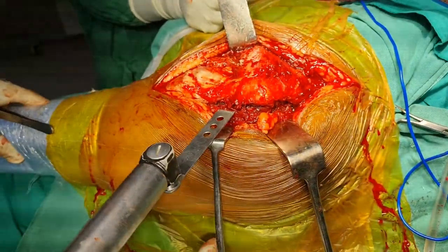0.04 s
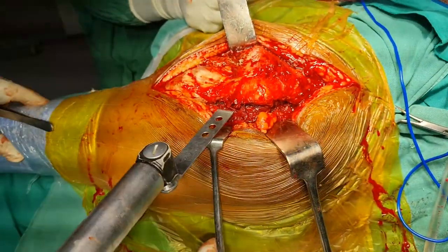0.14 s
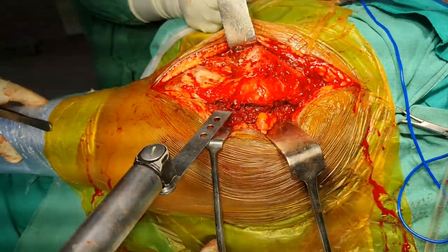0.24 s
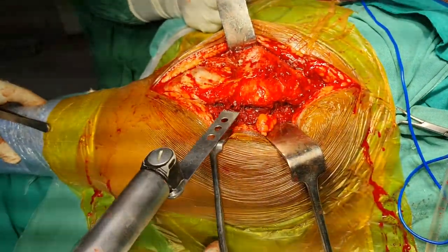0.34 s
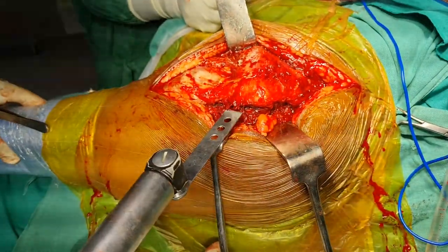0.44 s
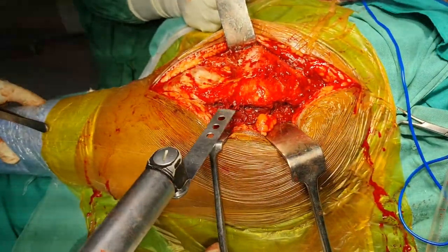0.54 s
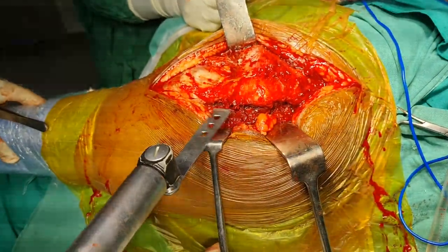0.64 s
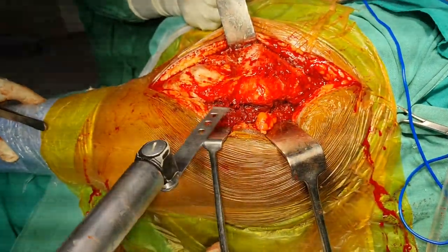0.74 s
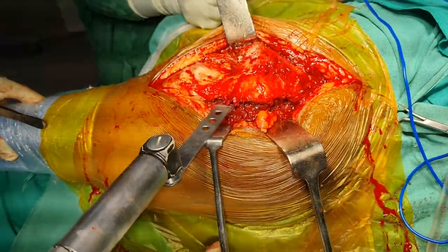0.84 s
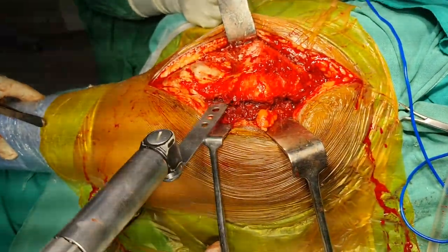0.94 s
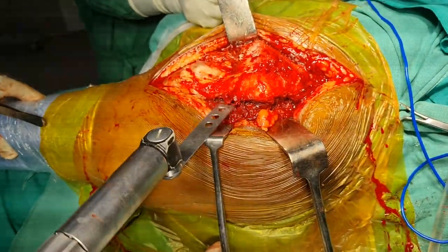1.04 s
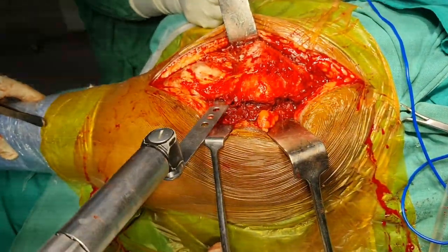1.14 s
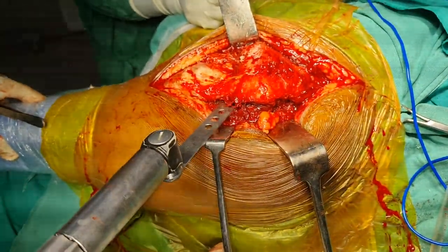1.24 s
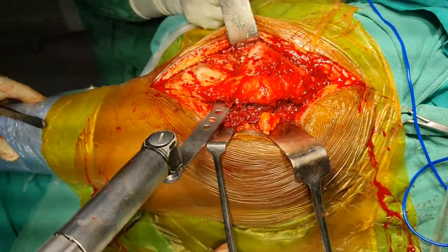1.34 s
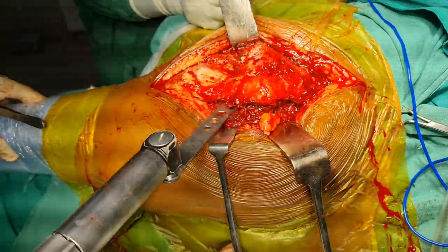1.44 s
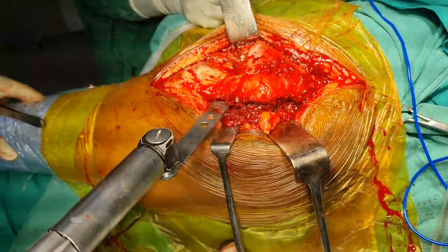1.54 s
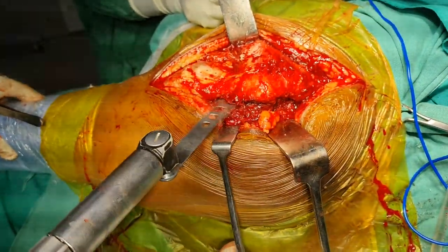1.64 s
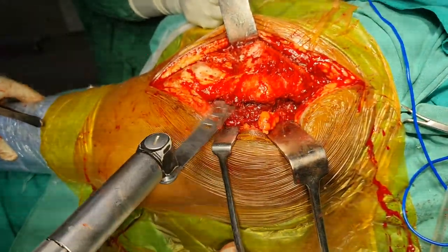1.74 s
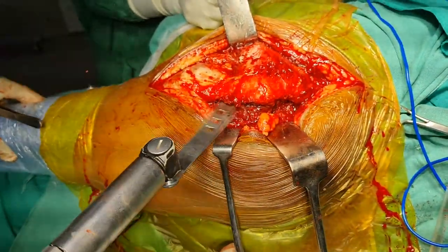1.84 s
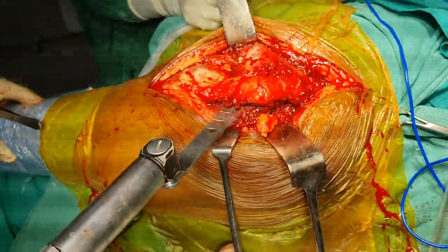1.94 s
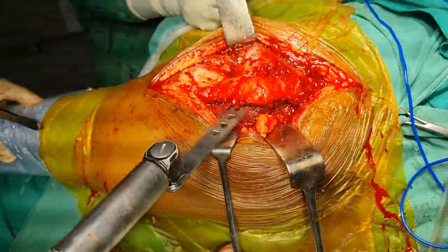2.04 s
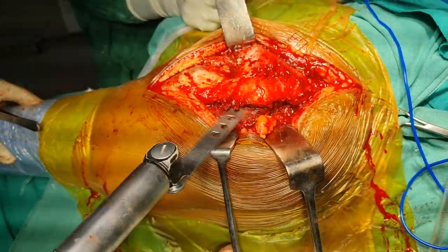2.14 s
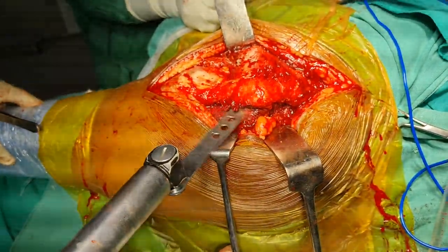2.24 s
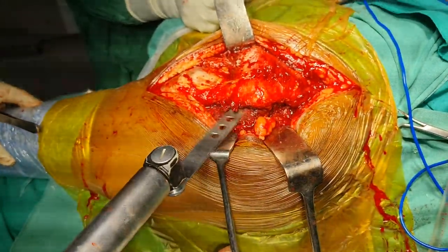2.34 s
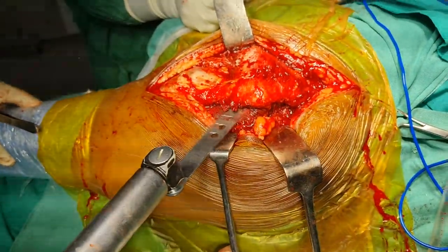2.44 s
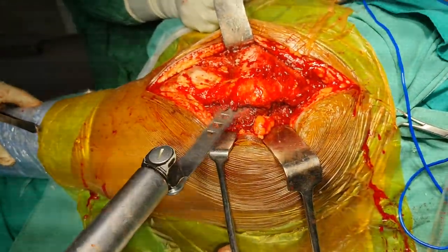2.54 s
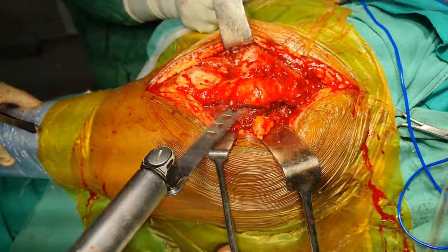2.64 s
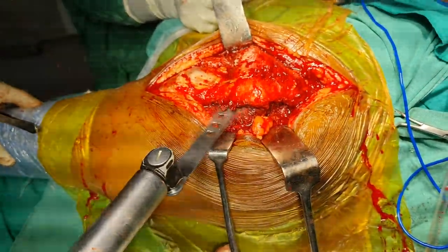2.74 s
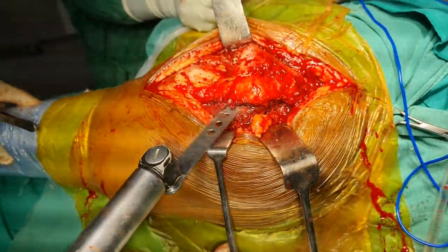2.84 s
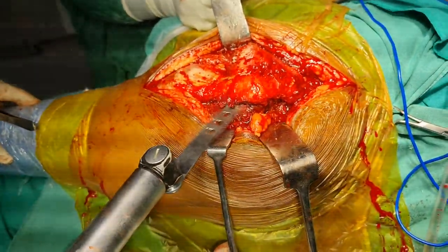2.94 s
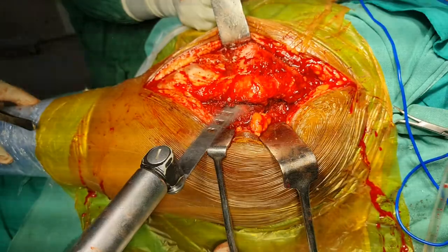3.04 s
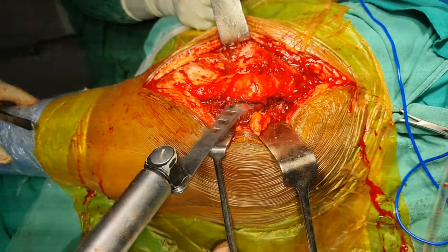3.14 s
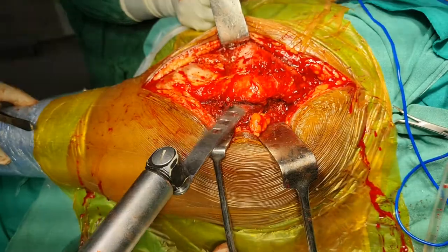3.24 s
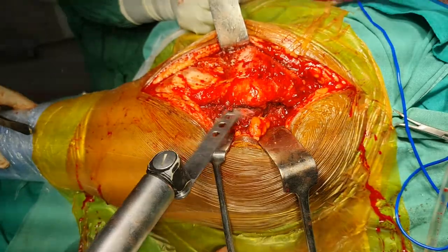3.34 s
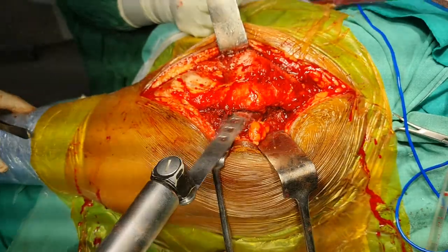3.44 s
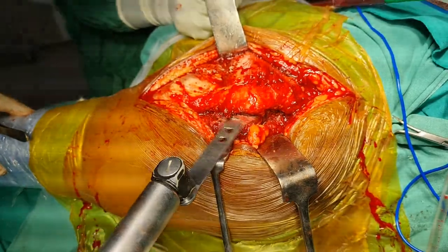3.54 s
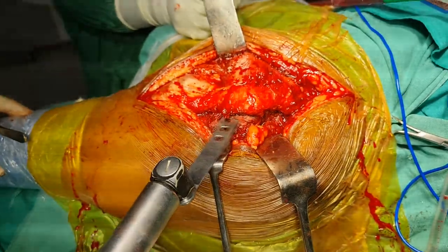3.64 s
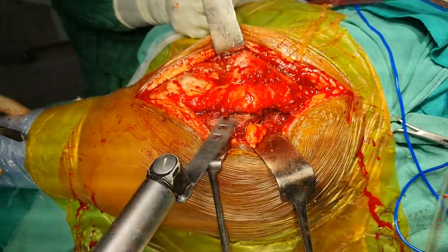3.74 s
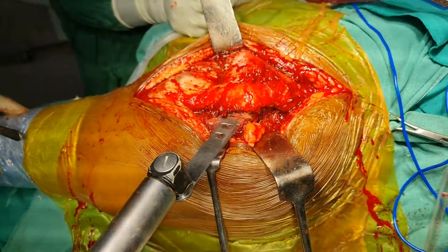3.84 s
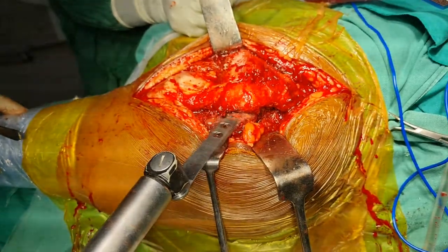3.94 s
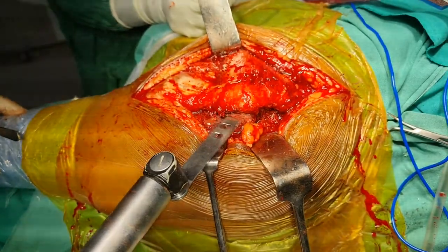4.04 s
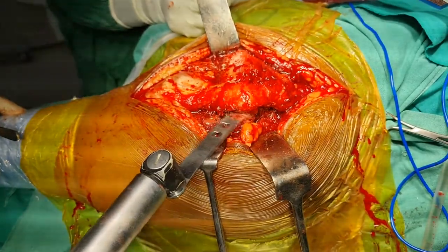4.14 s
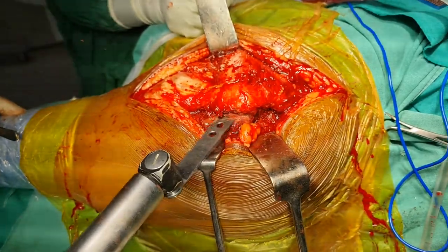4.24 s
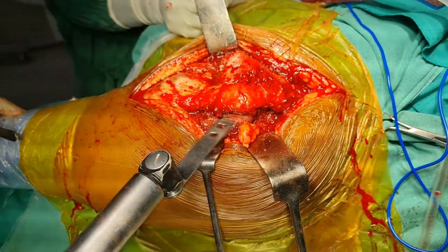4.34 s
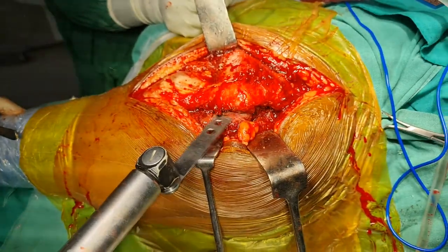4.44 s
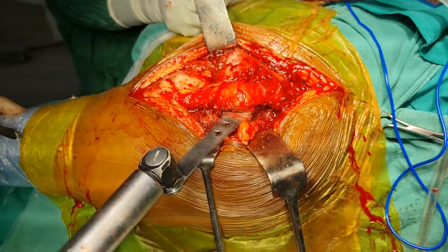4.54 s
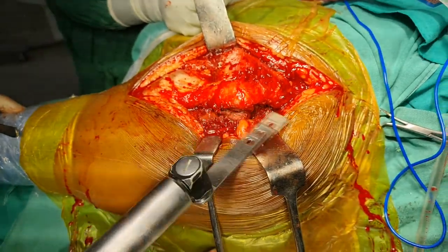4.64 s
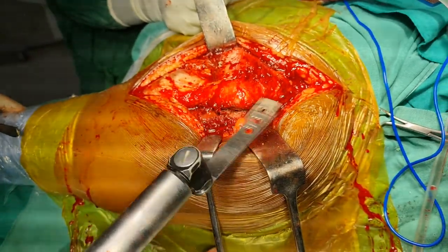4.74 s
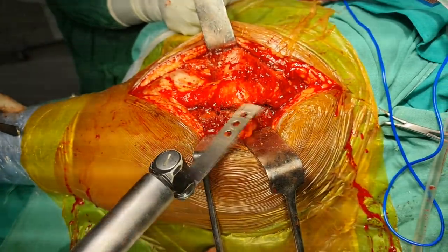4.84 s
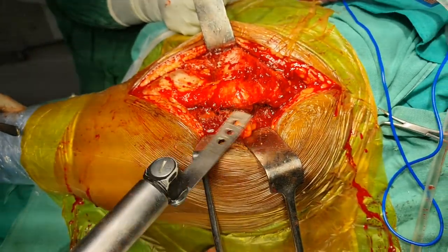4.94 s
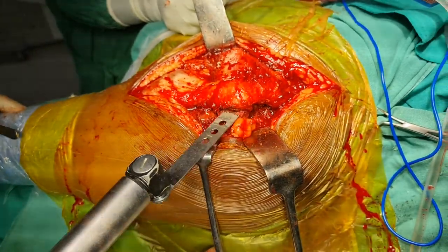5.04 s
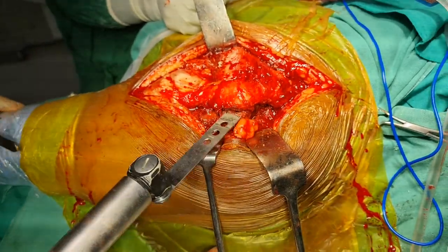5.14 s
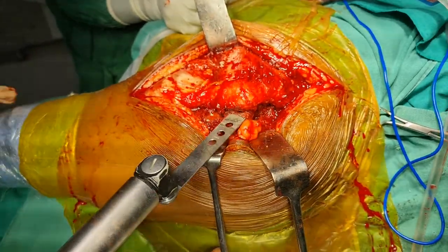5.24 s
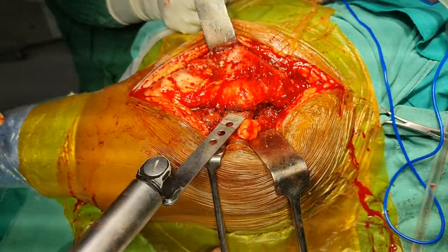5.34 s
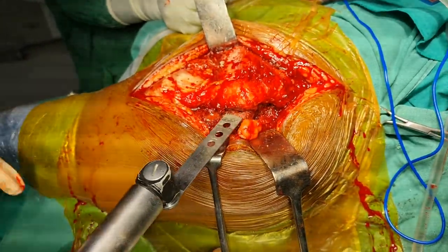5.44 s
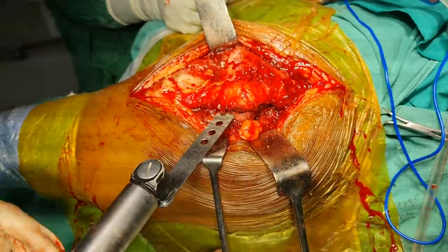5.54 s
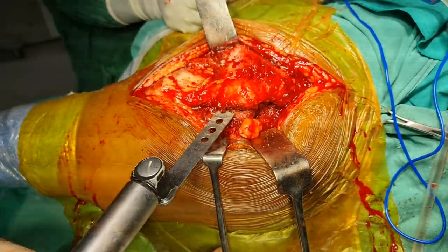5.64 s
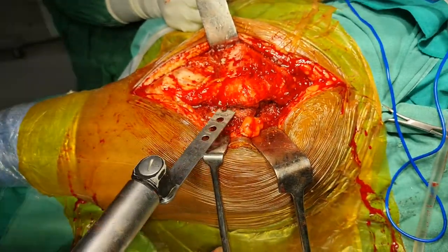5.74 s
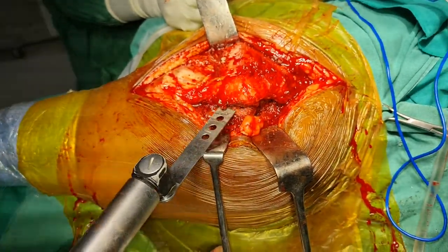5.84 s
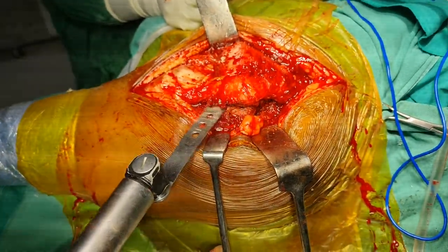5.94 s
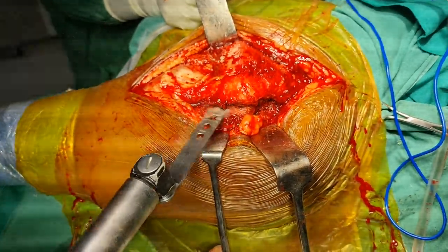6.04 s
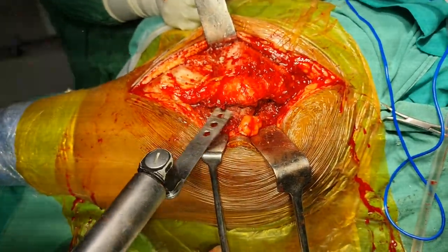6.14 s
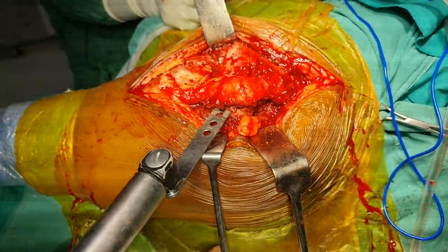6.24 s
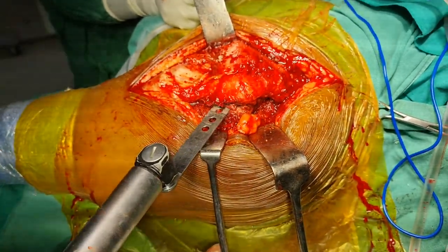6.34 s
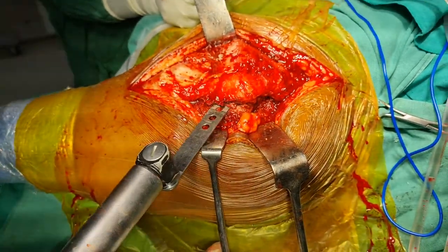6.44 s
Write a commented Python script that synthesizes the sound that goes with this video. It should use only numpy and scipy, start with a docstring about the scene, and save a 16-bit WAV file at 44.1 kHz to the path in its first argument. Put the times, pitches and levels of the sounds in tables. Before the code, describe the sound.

An oscillating bone saw rattles at low speed, races into a hard buzzing whine as it cuts, stops, then blips once and taps bone.

```python
"""An oscillating bone saw close to two microphone ports in a hard-walled theatre. Ventilation murmurs
throughout (shaped noise); suction spits and hisses away at once (decaying noise), and small ticks fall.
The saw idles, runs up, cuts and stops: its blade sings in multiples of the stroke rate and hisses, its
gears rasp, its teeth grind, and it slaps the bone (struck resonances); low thumps fall meanwhile (decaying
sines). The saw is blipped once more, and the blade tip taps the bone (noise bursts through resonances)."""
import sys
import numpy as np
from scipy import signal
from scipy.fft import rfft, irfft, next_fast_len
from scipy.io import wavfile
from scipy.ndimage import uniform_filter1d

SR = 44100
rng = np.random.default_rng(int(sys.argv[2]) if len(sys.argv) > 2 else 0)


def master_out(mix):
    """Clip the mix to full scale and print it as 16-bit PCM to the path in sys.argv[1]."""
    frames = np.transpose(np.atleast_2d(mix))
    ceiling = np.clip(frames, -1, 1)
    pcm = np.round(ceiling * 32767).astype(np.int16)
    wavfile.write(sys.argv[1], SR, pcm)


N = 286209
T = np.arange(N) / SR  # s


def amp(db):
    """Level to amplitude: 20 dB per factor of ten."""
    return 10 ** (np.asarray(db) / 20)


def unit(x):
    """Normalisation to an rms of 1."""
    return x / np.sqrt(np.mean(x ** 2) + 1e-20)


def along(points, hz):
    """Interpolation of (f/Hz, value) points on a logarithmic frequency axis."""
    f, v = np.transpose(points)
    return np.interp(np.log(hz + 1), np.log(f + 1), v)


def gain(table):
    """Spectral envelope: the gain at each frequency from (f/Hz, level/dB) points."""
    return lambda hz: amp(along(table, hz))


def curves(rows):
    """Linear interpolation in time: one value per sample for each column after t/s."""
    s, *columns = np.transpose(rows)
    return [np.interp(T, s, column) for column in columns]


def wobble(rate):
    """Slow random modulation: Gaussian knots, rate of them a second, joined by lines."""
    knots = rng.standard_normal(int(N * rate / SR) + 2)
    return np.interp(np.arange(N) * rate / SR, np.arange(len(knots)), knots)


def filtered(x, response):
    """Linear filtering: the spectrum times a complex response of frequency."""
    m = next_fast_len(N + SR // 2)
    return irfft(rfft(x, m) * response(np.fft.rfftfreq(m, 1 / SR)), m)[..., :N]


def modes(table):
    """Modal superposition: causal response of resonances (f/Hz, width/Hz, level/dB)."""
    def response(f):
        return sum(amp(db) * 1j * f * w / (c * c - f * f + 1j * f * w) for c, w, db in table)
    return response


def patchy(x, patchy_db):
    """Random modulation in patches of time and frequency."""
    z = signal.stft(x, nperseg=512)[2]
    field = rng.standard_normal(z.shape[-2:])
    field = uniform_filter1d(uniform_filter1d(field, 7, 0), 12, 1)
    return unit(signal.istft(z * amp(patchy_db * unit(field)), nperseg=512)[1][..., :N])


def gated(turns, depth, scatter_db):
    """Cyclic modulation: two noises swell once a turn, each turn at a new strength."""
    strengths = amp(scatter_db * rng.standard_normal(int(turns[-1]) + 1))
    swell = np.exp(-depth * np.cos(2 * np.pi * turns))
    return rng.standard_normal((2, N)) * strengths[turns.astype(int)] * swell


def pair(x, spectrum, alike, patchy_db):
    """Partial coherence: two coloured noises mixed to a given left-right likeness, rms 1."""
    def response(hz):
        angle = np.arccos(np.clip(along(alike, hz), -1, 1)) / 2
        return spectrum(hz) * [np.cos(angle), np.sin(angle)]
    mid, side = filtered(patchy(x, patchy_db), response)
    return unit(np.array([mid + side, mid - side]))


def stack(turns, stroke_hz, order, level, swell_db, blur):
    """Harmonic synthesis: multiples swell and waver one by one, a little apart at the ports, rms 1."""
    x, coarse = np.zeros((2, N)), np.arange(0, N, 256)
    for k in order:
        level_db = np.interp(np.arange(N), coarse, level(k * stroke_hz[coarse], coarse / SR))
        level_db = level_db + swell_db * (wobble(9) + 1.57 * wobble(35))
        # higher multiples waver more
        phase = 2 * np.pi * (k * turns + rng.random()) + k * blur * wobble(40)
        apart = 0.97 * wobble(5)  # rad
        x += amp(level_db) * np.sin([phase + apart, phase - apart])
    return unit(x)


# left-right coherence of the background: f/Hz, likeness (1 = identical)
BACKGROUND_LIKENESS = [(60, 0.97), (240, 0.93), (950, 0), (3770, 0.061), (15000, 0.2)]
# ventilation spectrum: f/Hz, relative level/dB
AIR_SPECTRUM = [(15, -39.5), (25, -22.5), (44, -6.5), (217, -4.5), (255, -4), (343, -7.5), (438, -8.5),
                (731, -15.5), (1440, -16.5), (9780, -40.5), (12100, -43.5), (15900, -70)]
# ventilation, lower while the saw is loud: t/s, level/dB
AIR_LEVEL = [(0, -47), (0.5, -48), (1, -50), (2, -59), (4.9, -60.5), (5.4, -55), (5.9, -52), (6.1, -57),
             (6.49, -53.5)]


def ventilation():
    """Broadband flow noise, coherent at the two ports in the bass and hardly above."""
    air = pair(rng.standard_normal((2, N)), gain(AIR_SPECTRUM), BACKGROUND_LIKENESS, patchy_db=0.5)
    return amp(curves(AIR_LEVEL)[0]) * air


# suction spectrum: f/Hz, relative level/dB
JET_SPECTRUM = [(710, -44), (1200, -30), (1400, -9), (1460, -35), (2530, -11), (2940, -16.5), (5630, -17.5),
                (6270, -3), (7790, -18.5), (15900, -18)]
# spits of the suction: t/s, level/dB
SUCTION_SPITS = [(0.0, -31), (0.136, -58.5), (0.238, -57.5), (0.315, -47.5)]
SPIT_T60_S, JET_DB, JET_FADE_DB_PER_S = 0.051, -56, 41.5


def suction():
    """Jet noise under exponential decay: a dying hiss and short spits."""
    flow = amp(JET_DB - JET_FADE_DB_PER_S * T)
    for s, db in SUCTION_SPITS:
        flow = flow + (T >= s) * amp(db - 60 * np.abs(T - s) / SPIT_T60_S)
    jet = pair(rng.standard_normal((2, N)), gain(JET_SPECTRUM), BACKGROUND_LIKENESS, patchy_db=7.5)
    return flow * jet


# clicks of metal and wet tissue: t/s, relative level/dB, f/Hz
SMALL_TICKS = [(0.074, -34.5, 5940), (0.139, -45.5, 3040), (0.314, -45.5, 6050), (5.539, -39.5, 6700),
               (5.6331, -38, 2939), (5.89, -31, 3757), (5.913, -34.5, 3560), (5.933, -23, 3157),
               (6.333, -30.5, 3060), (6.3677, -27, 5690), (6.4333, -36.5, 3084), (6.4718, -23.5, 3530)]


def ticks():
    """Damped oscillation plus a differentiated noise burst: small bright clicks."""
    x, t = np.zeros(N + 600), np.arange(600) / SR
    for s, db, hz in SMALL_TICKS:
        envelope = amp(db - 60 * t / .015) * (1 - np.exp(-t / .001))
        tone = 0.39 * np.sin(2 * np.pi * hz * t)
        burst = 0.46 * np.diff(rng.standard_normal(601))
        x[round(s * SR):][:600] += envelope * (tone + burst)
    return x[:N]


# motor speed, sagging as the blade bites: t/s, stroke rate f/Hz
STROKE_RATE = [(0.5, 56.8), (0.72, 90.95), (0.86, 102.5), (0.98, 101.9), (1.1, 106.9), (1.15, 105.8),
               (1.23, 95.4), (1.41, 92.47), (1.48, 100.9), (1.58, 105.8), (1.66, 141.4), (1.79, 252.3),
               (1.88, 249.1), (2.13, 253.8), (2.2, 250.4), (2.57, 246.5), (2.74, 243.5), (2.98, 244.7),
               (3.1, 238.8), (3.23, 238.2), (3.3, 243.6), (3.38, 245.2), (3.52, 241.8), (3.6, 237.1),
               (3.69, 240.9), (3.81, 240.2), (4.01, 248.2), (4.08, 245.3), (4.18, 240.5), (4.33, 251.1),
               (4.43, 240.3), (4.53, 246.4), (4.62, 248.3), (4.71, 257.9), (4.87, 257), (4.92, 255.9),
               (5.0, 170.9), (5.9, 60.8), (6.01, 163), (6.052, 236.6), (6.074, 247.4), (6.14, 116.9)]
IDLE_HZ, FULL_HZ = 117, 248  # top of idling, full speed


def stroke():
    """Phase is the integral of frequency: stroke rate, share of full speed, jittered stroke count."""
    (stroke_hz,) = curves(STROKE_RATE)
    fast = np.clip((stroke_hz - IDLE_HZ) / (FULL_HZ - IDLE_HZ), 0, 1)
    turns = np.cumsum(stroke_hz * (1 + 0.00214 * wobble(60))) / SR
    return stroke_hz, fast, turns


# trigger pressed: start t/s, end t/s
TRIGGER = [(0.524, 5.0), (5.9, 6.14)]
# t/s, then level/dB of the gear rasp, the treble hiss, the blade's overtones and its whine
LAYER_LEVELS = [(0.5, -81, -90, -63, -62), (0.55, -44.5, -60, -58, -50), (0.62, -30.5, -43.5, -55, -44),
                (0.73, -25, -31, -38, -40), (0.86, -24, -32, -33, -32.5), (0.95, -24.5, -31, -38, -30.5),
                (0.98, -25.5, -26.5, -33, -34), (1.02, -29, -33, -33, -44), (1.06, -25.5, -24.5, -28, -29),
                (1.1, -27.5, -27, -35, -33), (1.15, -25, -24.5, -32, -30), (1.23, -23.5, -30, -46, -34),
                (1.3, -23, -28, -36, -32.5), (1.37, -24, -37, -31, -34), (1.54, -24.5, -34, -29, -31.5),
                (1.6, -21, -31, -28.5, -25), (1.7, -18, -26, -21.5, -24), (1.77, -17.5, -28.5, -17.5, -24),
                (1.82, -23, -24.5, -19.5, -18.5), (1.9, -21.5, -28.5, -20.5, -20.5),
                (2.2, -27, -26.5, -18.5, -21), (2.57, -26.5, -25, -25, -21.5), (2.7, -30, -23, -23.5, -26),
                (2.8, -37, -26.5, -27, -27.5), (2.98, -27.5, -28, -25.5, -23.5),
                (3.1, -27.5, -32.5, -25, -23), (3.23, -27.5, -29.5, -26.5, -23),
                (3.3, -35, -28.5, -22, -18), (3.6, -26.5, -29, -24, -21), (3.81, -26.5, -27, -20.5, -20.5),
                (4.01, -26.5, -28, -22, -19), (4.33, -26.5, -26.5, -21, -22),
                (4.53, -23.5, -29, -23.5, -19.5), (4.62, -21.5, -24, -23, -23),
                (4.66, -25.5, -30, -24, -28), (4.71, -21.5, -21.5, -24.5, -22),
                (4.75, -28.5, -32, -18.5, -23.5), (4.87, -21, -30.5, -24, -23.5),
                (4.92, -22, -32, -19.5, -28), (4.94, -25.5, -32.5, -48.5, -30), (4.97, -34, -35, -46, -39),
                (5.0, -45, -46.5, -55, -58.5), (5.9, -55, -80.5, -60.5, -58), (5.944, -42, -56, -61, -48),
                (5.99, -31, -39, -45, -37), (6.02, -19.5, -33.5, -22.5, -37),
                (6.052, -20.5, -29, -15.5, -25), (6.074, -30, -26, -15.5, -15), (6.1, -22, -32, -25, -34),
                (6.14, -38, -36, -64, -54)]
# teeth grinding on bone: t/s, level/dB
GRIND_LEVEL = [(0.5, -60), (0.62, -39.5), (0.7, -40), (0.97, -40), (1.03, -31), (1.1, -33), (1.3, -29.5),
               (1.5, -46), (1.7, -14.5), (1.8, -40), (2.5, -39.5), (3, -46.5), (3.7, -39.5), (4.5, -36.5),
               (4.64, -30), (4.8, -38), (4.95, -33.5), (5.0, -56), (5.9, -57.5), (5.99, -31), (6.02, -13),
               (6.05, -21), (6.14, -52)]
FLICKER_DB, FLICKER_PER_S = 1, 14  # each of the four layers flickers by itself
# the squeal follows the treble's departure from a reference, by so many dB per dB
SQUEAL_DB, SQUEAL_PER_TREBLE_DB, TREBLE_REFERENCE_DB = -31.5, 0.87, -28


def saw():
    """Superposition of sources phase-locked to one stroke counter."""
    pressed = sum((T > a) & (T < b) for a, b in TRIGGER) * 1.
    on = uniform_filter1d(pressed, size=400)
    stroke_hz, fast, turns = stroke()
    layers_db = [db + FLICKER_DB * wobble(FLICKER_PER_S) for db in curves(LAYER_LEVELS)]
    rasp_db, hiss_db, over_db, whine_db = layers_db
    squeal_db = SQUEAL_DB + SQUEAL_PER_TREBLE_DB * (hiss_db - TREBLE_REFERENCE_DB)
    mix = starting(turns) + amp(whine_db) * whine(turns, stroke_hz, fast)
    mix = mix + amp(rasp_db) * rasp(turns, fast) + amp(hiss_db) * hiss(turns)
    mix = mix + amp(over_db) * overtones(turns, stroke_hz, fast)
    mix = mix + amp(squeal_db) * squeal(turns, stroke_hz)
    mix = mix + amp(curves(GRIND_LEVEL)[0]) * grind(turns)
    return on * mix + slaps(turns)


# left-right coherence of the saw's noise: f/Hz, likeness (1 = identical)
SAW_LIKENESS = [(500, 0.13), (1400, 0.27), (3000, 0.18), (5000, 0.13), (9000, 0.16), (15000, 0.38)]


def saw_noise(noises, spectrum, patchy_db):
    """Partial coherence of an extended source near two ports."""
    return pair(noises, spectrum, SAW_LIKENESS, patchy_db)


# two resonances of the housing: f/Hz, width/Hz, relative level/dB
HOUSING_MODES = [(1210, 170, -3), (3330, 420, 0)]
# the housing sings as the motor starts: peak t/s, level/dB
MOTOR_STARTS = [(0.62, -28.5), (5.96, -43)]
START_RISE_DB_PER_S, START_FALL_DB_PER_S = 186, 150.5


def starting(turns):
    """Transient resonance: the housing's two modes swell and decay exponentially."""
    envelope = 0
    for s, db in MOTOR_STARTS:
        slope = np.where(T < s, START_RISE_DB_PER_S, START_FALL_DB_PER_S)
        envelope = envelope + amp(db - slope * np.abs(T - s))
    housing = modes(HOUSING_MODES)
    return envelope * saw_noise(gated(turns, .4, 1.5), lambda f: np.abs(housing(f)) ** 2, patchy_db=-1.0)


# immersion of the blade: t/s, share of the blade in the cut
CUT_DEPTH = [(0, 0.051), (2.8, 0.065), (3.3, 0.87), (4.6, 0.77), (4.7, 0.07), (6.49, 0.21)]


def sunk(s):
    """Boundary condition: the share of the blade held by bone at time s."""
    return np.clip(np.interp(s, *np.transpose(CUT_DEPTH)), 0, 1)


LIFT_S, LIFT_LENGTH_S, RETURN_S = 4.64, .03, 5.5  # leaves the cut; back on the bone after the pause


def lifted(s):
    """Boundary condition: 1 once the blade is free of the bone, 0 on it."""
    return np.clip((s - LIFT_S) / LIFT_LENGTH_S, 0, 1) * (s < RETURN_S)


# eight lowest multiples at full speed, one row each, relative: at the surface level/dB, gain there per sag
# dB/Hz, deep in the cut level/dB, gain there per sag dB/Hz, lifted free level/dB
WHINE_FULL = [(-30, -0.4, -32.5, 1, -24.5), (-25, -.5, -23, 1.35, -24.5), (-5.5, 0, -7, -0.64, -6),
              (-19, -1.5, -13, 1.65, -4), (-4.5, 0, -1.5, 0, -11), (-8.5, 0, -13, 0.2, -12),
              (-18, -1, -10, -1.4, -10), (-11.5, 0.34, -9.5, 1.5, -17)]
# the same multiples at low speed: f/Hz, relative level/dB
WHINE_IDLING = [(90, -9.5), (110, -22), (300, -27), (400, -22.5), (500, -14.5), (620, -12.5), (725, -1.5),
                (790, -14.5), (1500, -8)]
LOADED_HZ, WHINE_SWELL_DB = 242.54, 2  # usual speed in the cut; random swell
PRESS_S, PRESS_DB_PER_S = 1.42, 17  # the slow stroke thuds ever harder as the blade is pressed on


def whine(turns, stroke_hz, fast):
    """Fourier series of the stroke: low harmonics weighted by speed, depth and load."""
    deep, free, x = sunk(T), lifted(T), 0
    sag_hz = np.clip(LOADED_HZ - stroke_hz, -8, 8)
    press_db = PRESS_DB_PER_S * np.clip(T - PRESS_S, -1, .3) * (T < RETURN_S)
    for k, (top_db, top_per_hz, cut_db, cut_per_hz, free_db) in enumerate(WHINE_FULL, 1):
        surface_db = top_db + top_per_hz * sag_hz
        buried_db = cut_db + cut_per_hz * sag_hz
        cutting_db = (1 - deep) * surface_db + deep * buried_db
        full_db = (1 - free) * cutting_db + free * free_db
        idle_db = along(WHINE_IDLING, k * stroke_hz) + (k == 1) * press_db
        db = (1 - fast) * idle_db + fast * full_db + WHINE_SWELL_DB * wobble(12)
        x = x + amp(db) * np.sin(2 * np.pi * (k * turns + rng.random()))
    return x


# housing and blade: f/Hz, width/Hz, relative level/dB
STEEL_MODES = [(1200, 90, 3), (2150, 140, -3), (3340, 400, 1), (4750, 120, -3), (6200, 400, -1),
               (11000, 190, -2), (12600, 180, -1), (14300, 150, 3)]


def steel_ring(f):
    """Resonant gain of the steel added to direct radiation."""
    return 1 + .6 * np.abs(modes(STEEL_MODES)(f))


# gear spectrum, idling: f/Hz, relative level/dB
GEARS_IDLING = [(210, -54), (350, -21.5), (472, -10.5), (512, -18.5), (548, -31), (709, -6), (770, 0.5),
                (1160, -10.5), (1480, -13.5), (2510, -2.5), (3340, 3), (3980, 2.5), (9000, -6.5),
                (11700, -31.5), (19800, -120)]
# gear spectrum at full speed: f/Hz, relative level/dB
GEARS_RACING = [(210, -82.5), (350, -53.5), (485, -19), (663, -50), (729, 0), (846, -45.5), (957, -15.5),
                (1210, -10.5), (1580, -23), (2870, -4.5), (9000, -8.5), (11700, -44.5), (19800, -120)]


def rasp(turns, fast):
    """Impact noise modulated twice a stroke: gear teeth bite at both ends of the swing."""
    idling = saw_noise(gated(2 * turns, 0.3, 1.8),
                       lambda f: gain(GEARS_IDLING)(f) * steel_ring(f), patchy_db=2.0)
    racing = saw_noise(gated(2 * turns, 0.96, 1.6), gain(GEARS_RACING), patchy_db=2.5)
    # the colour changes as the motor speeds up, at equal power
    return np.sqrt(1 - fast) * idling + np.sqrt(fast) * racing


# treble hiss: f/Hz, relative level/dB
HISS_SPECTRUM = [(3820, -31.5), (6500, 3.5), (7630, -4), (8480, 2.5), (10700, 1.5), (11800, 6.5),
                 (13500, -6), (14900, 0), (15900, -31)]


def hiss(turns):
    """Broadband noise modulated once a stroke and coloured by the steel's modes."""
    return saw_noise(gated(turns, 0.15, 0.94),
                     lambda f: gain(HISS_SPECTRUM)(f) * steel_ring(f), patchy_db=1.0)


# blade at the surface: f/Hz, relative level/dB
BLADE_SURFACE = [(470, -58.5), (800, -28), (859, -15), (980, -10), (1220, -11.5), (1290, -12.5),
                 (1380, -16.5), (1480, -19), (1760, -3.5), (1870, -20.5), (2200, -10.5), (3300, -5),
                 (3960, -16), (4950, -4.5), (9000, -28.5), (11700, -46.5), (19800, -120)]
# blade deep in the cut: f/Hz, relative level/dB
BLADE_BURIED = [(470, -37.5), (800, -8.5), (941, -6), (1150, -3.5), (1220, -3), (1350, -20), (1640, -9.5),
                (1930, -10), (2590, -12.5), (2950, -2.5), (3340, -11), (3920, -4.5), (4250, -6), (4900, -6),
                (9000, -18.5), (11700, -49), (19800, -120)]
# blade lifted free: f/Hz, relative level/dB
BLADE_LIFTED = [(1290, -32), (2200, -3.5), (2500, -11), (2850, 2), (3010, -8.5), (3380, -9), (3630, 1.5),
                (4130, -12), (4440, -2.5), (6740, -14.5), (7150, -20.5), (8290, -16.5), (9000, -21.5),
                (11700, -51.5), (19800, -120)]
LIFTED_DB = -4
SLOW_BLUR = 20  # overtones waver this much more below full speed


def overtones(turns, stroke_hz, fast):
    """Harmonics under a formant envelope: the blade's response shifts with its boundary."""
    def blade(hz, s):
        cutting = (1 - sunk(s)) * along(BLADE_SURFACE, hz) + sunk(s) * along(BLADE_BURIED, hz)
        return (1 - lifted(s)) * cutting + lifted(s) * (LIFTED_DB + along(BLADE_LIFTED, hz))
    blur = .05 * (1 + SLOW_BLUR * (1 - fast))
    return stack(turns, stroke_hz, order=range(9, 36), level=blade, swell_db=1.7, blur=blur)


# squeal band: f/Hz, relative level/dB
SQUEAL_SPECTRUM = [(9000, -48), (12000, -7), (13800, -2), (14500, -3), (15300, 1), (15900, -15.5)]


def squeal(turns, stroke_hz):
    """High harmonics damped by bone contact, plus noise in the same band."""
    tones = stack(turns, stroke_hz, order=range(55, 65),
                  level=lambda hz, s: along(SQUEAL_SPECTRUM, hz), swell_db=3.5, blur=.02)
    noise = saw_noise(gated(turns, 0.29, 1.8), gain(SQUEAL_SPECTRUM), patchy_db=3.0)
    # the bone damps the blade's tones; they grow with the square of the speed
    return (1 - sunk(T)) * np.clip(stroke_hz / 250, 0, 1) ** 2 * tones + 1.3 * noise


# bone, also rung by the slaps and knocks: f/Hz, width/Hz, relative level/dB
BONE_MODES = [(740, 300, 0), (1250, 500, 2), (2000, 700, -4), (2900, 800, -9)]


def grind(turns):
    """Friction noise modulated once a stroke: the teeth excite the bone's modes."""
    def spectrum(f):
        return np.abs(modes(BONE_MODES)(f)) ** 2 * f ** 4 / (f ** 4 + 550 ** 4)  # less bass
    return saw_noise(gated(turns, .6, 1.1), spectrum, patchy_db=2.5)


# spells of the blade slapping the bone: start t/s, end t/s, relative level/dB
SLAP_SPELLS = [(1.004, 1.066, -6), (1.14, 1.19, -18), (1.25, 1.32, -14), (1.555, 1.78, -14),
               (3.7, 3.74, -16), (3.855, 3.885, -13), (4.62, 4.65, -12), (4.83, 4.85, -16),
               (4.92, 4.95, -12), (5.998, 6.05, -7), (6.055, 6.12, -11)]


def slaps(turns):
    """Impulse response: one blow a stroke, a fraction of a ms long, rings the bone."""
    blows = np.zeros(N)
    for start, end, db in SLAP_SPELLS:
        a, b = round(start * SR), round(end * SR)
        blows[a:b] += amp(db) * np.diff(np.floor(turns[a:b] - turns[a]), prepend=-1)
    blows *= amp(0.83 * rng.standard_normal(N))

    def response(f):
        thin = (1j * f / (500 + 1j * f)) ** 4  # the small blade radiates no bass
        contact = 1 / (1 + 1j * f / 2400) ** 2
        return modes(BONE_MODES)(f) * thin * contact
    return amp(25) * filtered(blows, response)


# low thumps: t/s, relative level/dB
LOW_THUMPS = [(1.649, -54), (1.721, -45), (2.104, -46.5), (2.293, -47), (2.558, -46), (2.724, -46),
              (3.082, -54), (3.49, -55), (3.756, -51), (3.94, -48), (4.092, -48), (4.168, -52),
              (4.435, -49), (4.62, -39), (4.909, -41)]


def thumps():
    """Damped oscillation at 45 Hz with a soft onset, stronger on the left."""
    x, t = np.zeros((2, N + 4000)), np.arange(4000) / SR
    envelope = t / 0.012 * np.exp(1 - t / 0.0097)
    for s, db in LOW_THUMPS:
        tone = np.sin(2 * np.pi * (45 * t + .6 * rng.random((2, 1))))
        x[:, round(s * SR):][:, :4000] += amp(db) * tone * envelope
    return x[:, :N] * amp([[5.5], [-5.5]])


# blade tip on bone: t/s, relative level/dB
TIP_KNOCKS = [(6.176, -18), (6.22, -22), (6.451, -34), (6.481, -23.5)]


def knocks():
    """Forced resonance: noise bursts falling 60 dB in 18 ms excite the bone's modes."""
    x, t = np.zeros(N + 900), np.arange(900) / SR
    for s, db in TIP_KNOCKS:
        x[round(s * SR):][:900] += amp(db - 60 * t / 0.018) * rng.standard_normal(900)
    return amp(5.5) * filtered(x[:N], modes(BONE_MODES))


# reverberation time of the theatre: f/Hz, T60 t/s
WALL_T60 = [(300, 1), (1000, 0.98), (4000, 1), (12000, 0.66)]


def echo(x):
    """Diffuse reverberation: each port has its own noise tail, each frequency its own decay."""
    hz, t, z = signal.stft(rng.standard_normal((2, SR)), SR, nperseg=256)
    decay = amp(-60 * t / along(WALL_T60, hz)[:, None])
    tail = signal.istft(z * decay, SR, nperseg=256)[1]
    late = np.pad(x, ((0, 0), (300, 0)))  # samples before the walls answer
    return signal.fftconvolve(late, tail / np.linalg.norm(tail[0]), axes=1)[:, :N]


# interaural-type level difference of the near sources: f/Hz, left minus right level/dB
PORT_LEAN = [(60, -2.5), (110, -0.5), (200, -0.5), (380, 3), (700, -6), (1290, -8), (2380, -11.5),
             (4400, 1.5), (8120, 4), (15000, 1)]
LAG_S = 0.000299  # treble limit of the delay at the right port


def scene():
    """Superposition, with level and phase differences between the ports for the near sources."""
    background = ventilation() + suction()
    near = ticks() + saw() + knocks()
    side = np.array([[.5], [-.5]])

    def ports(hz):
        late = hz ** 3 / (hz ** 2 + 800 ** 2)  # the bass arrives at both ports together
        return amp(side * along(PORT_LEAN, hz)) * np.exp(2j * np.pi * late * side * LAG_S)
    return background + filtered(near + amp(-11.5) * echo(near), ports) + thumps()


TOP_HZ = 15950


def record(dry):
    """Soft saturation rounds the highest peaks; an ideal low-pass sets the band limit."""
    rounded = dry / (1 + np.abs(dry / 1.7) ** 6) ** (1 / 6)
    return filtered(rounded, lambda hz: hz < TOP_HZ)


dry = scene()
out = record(dry)
master_out(out)
```